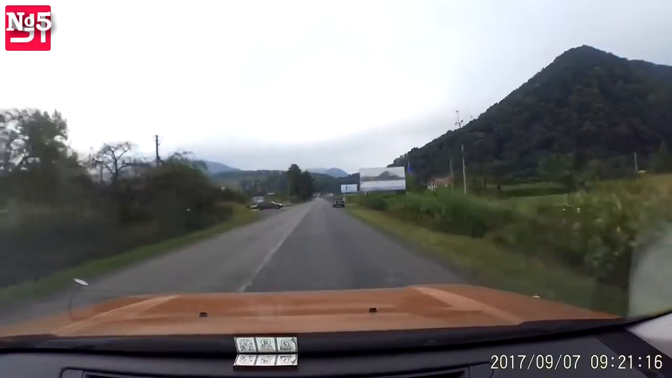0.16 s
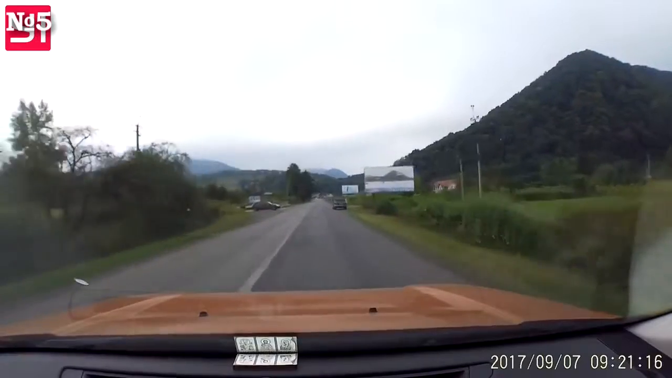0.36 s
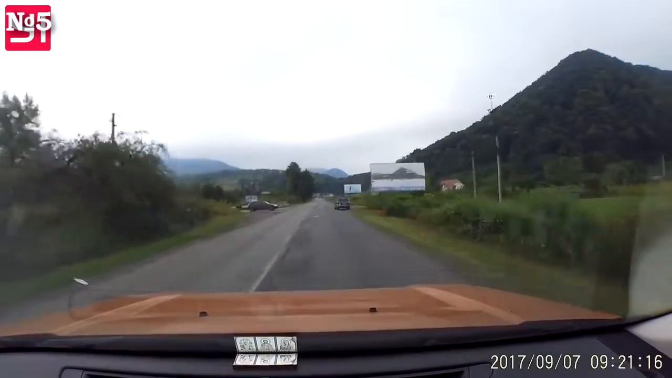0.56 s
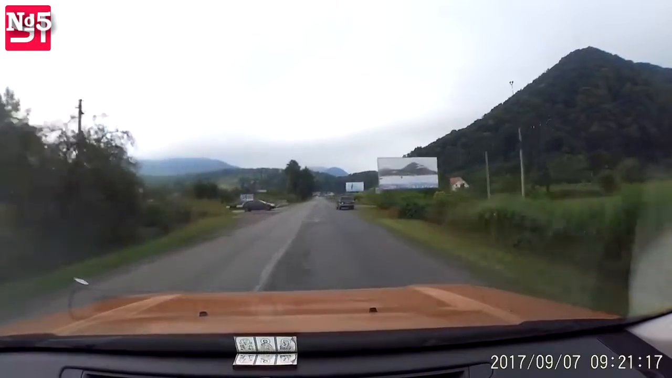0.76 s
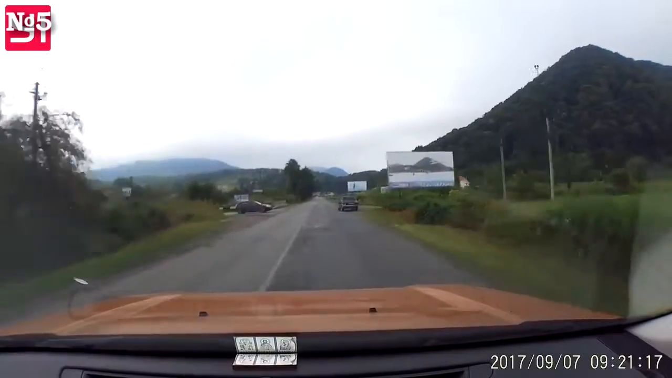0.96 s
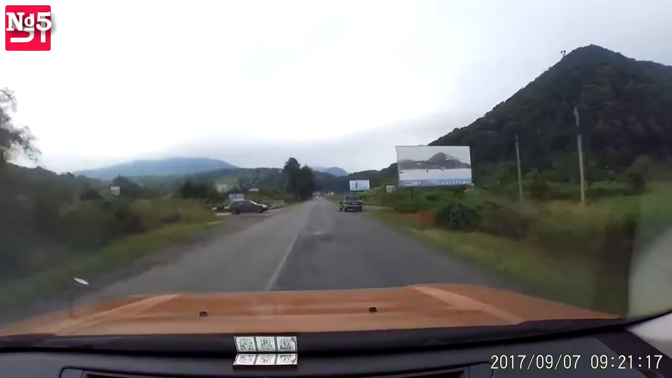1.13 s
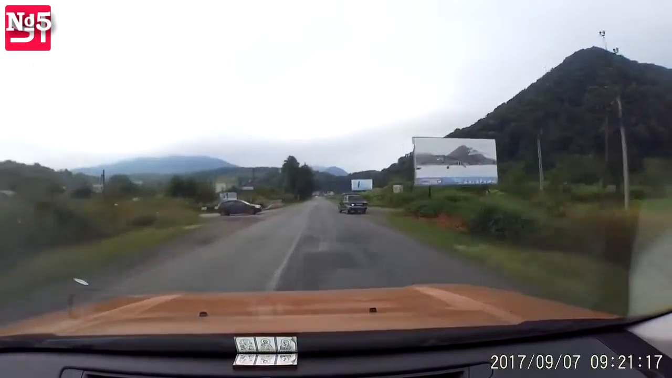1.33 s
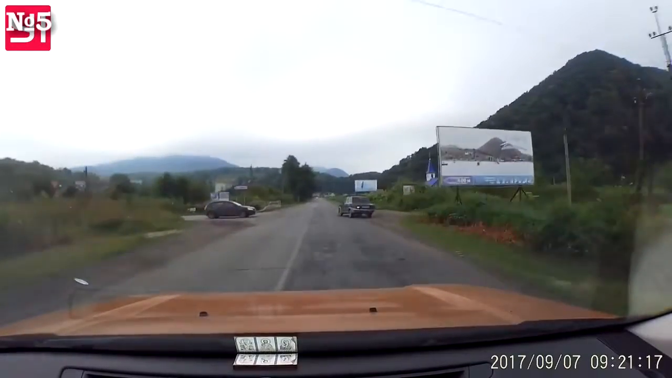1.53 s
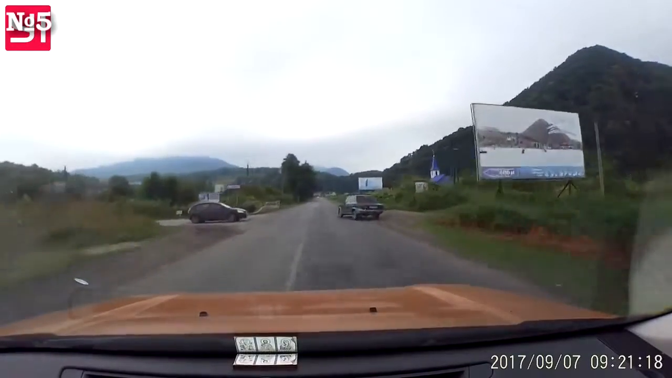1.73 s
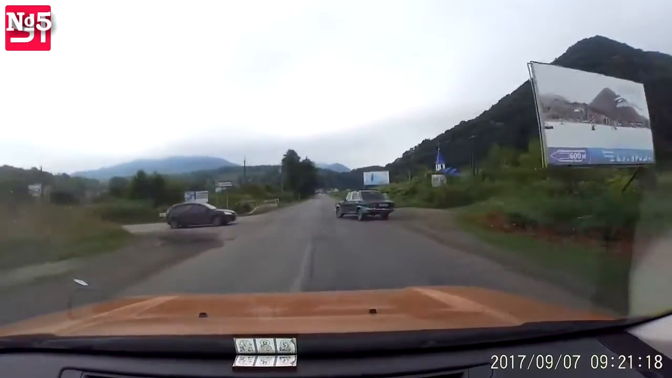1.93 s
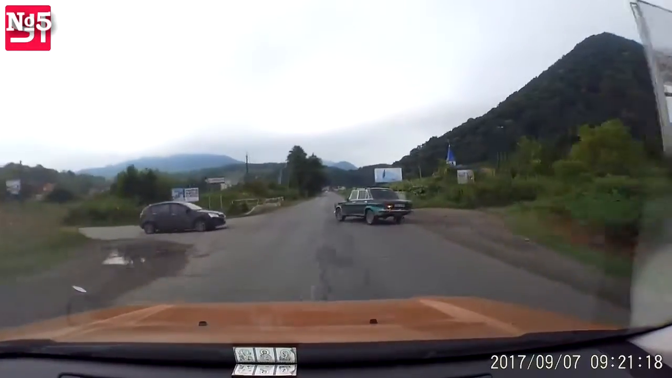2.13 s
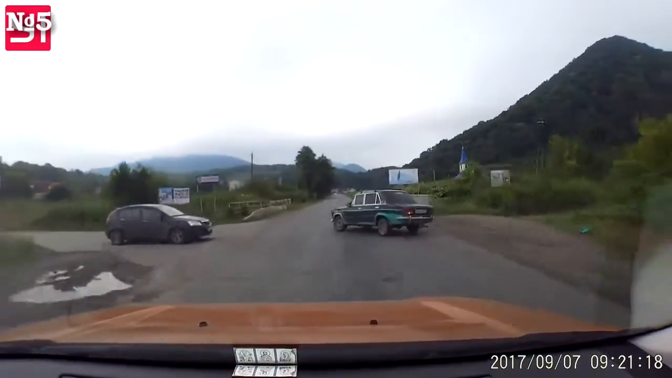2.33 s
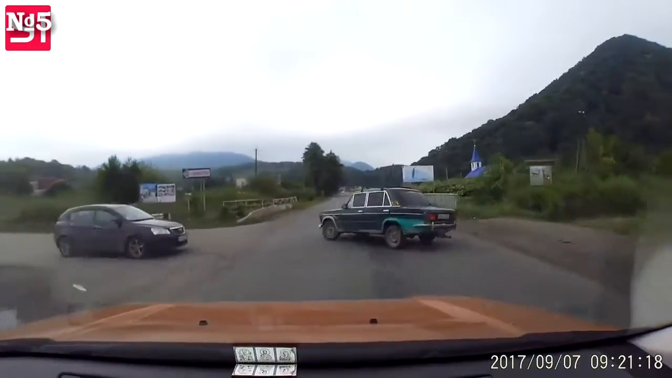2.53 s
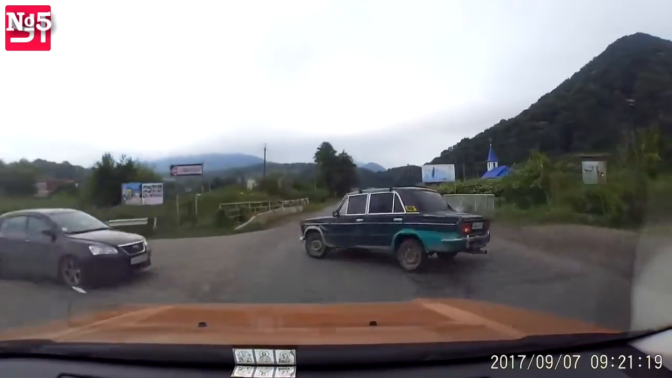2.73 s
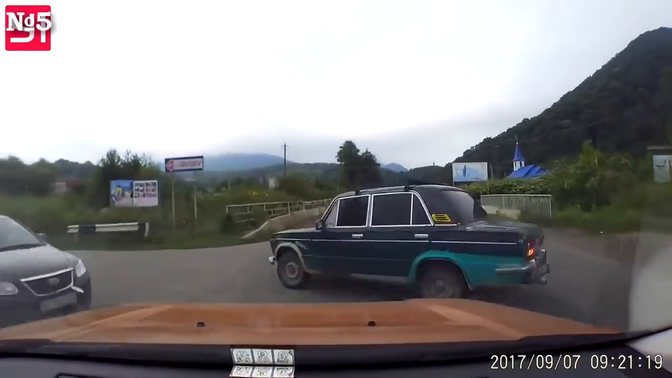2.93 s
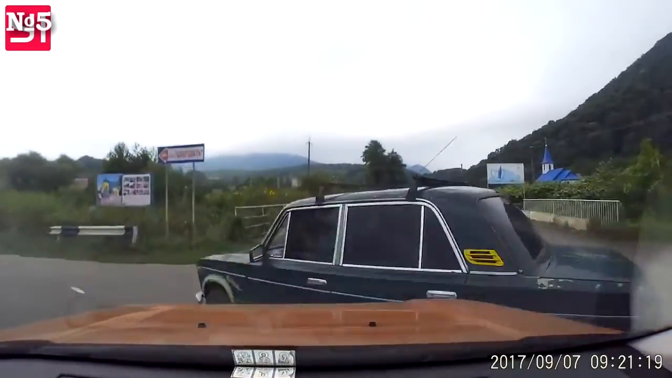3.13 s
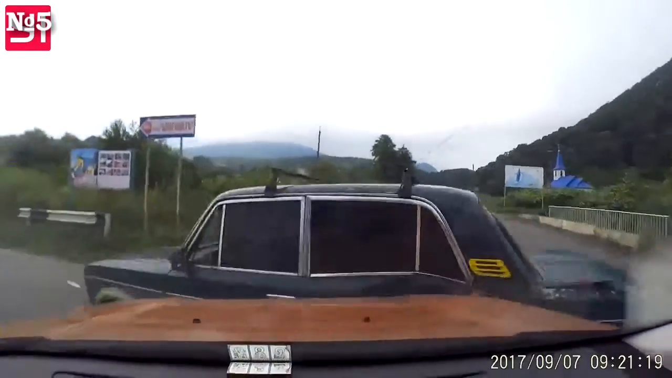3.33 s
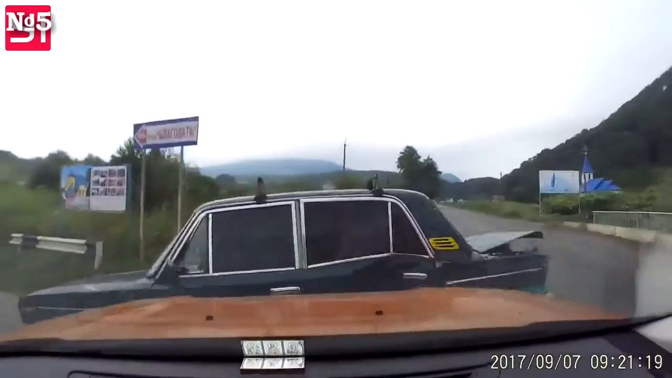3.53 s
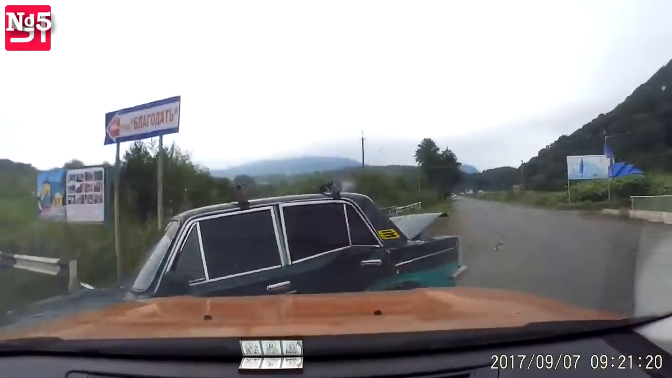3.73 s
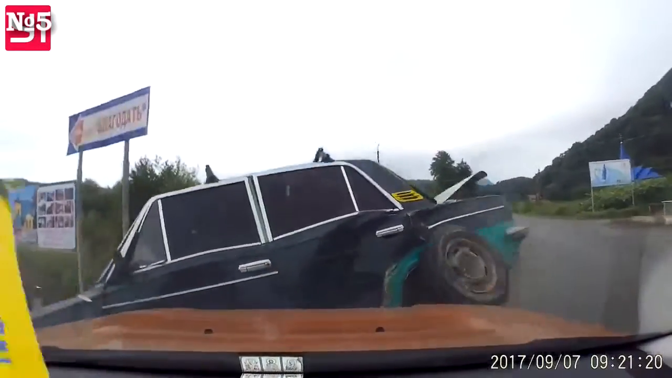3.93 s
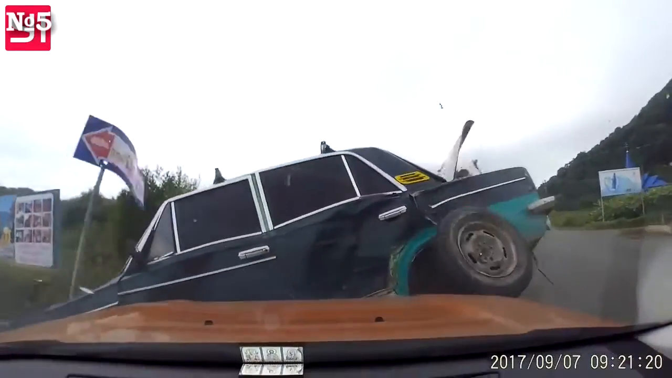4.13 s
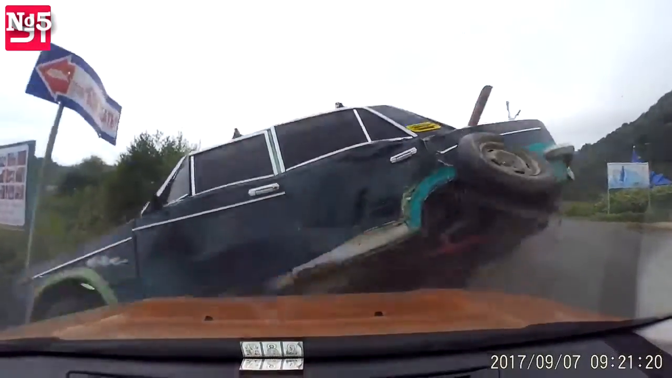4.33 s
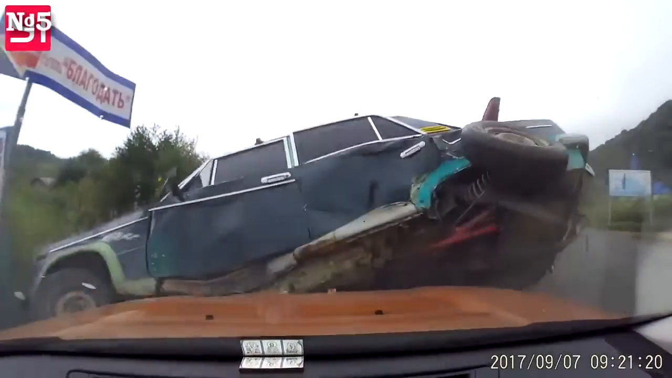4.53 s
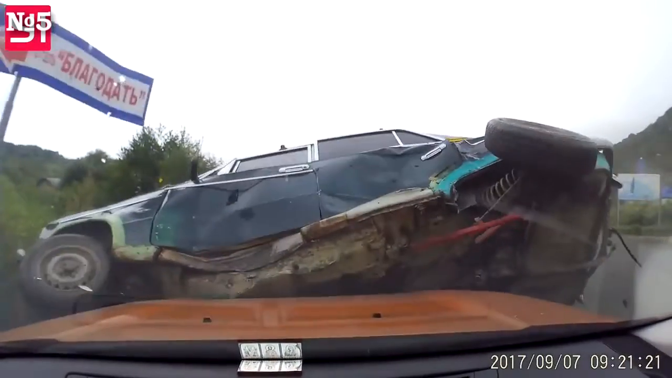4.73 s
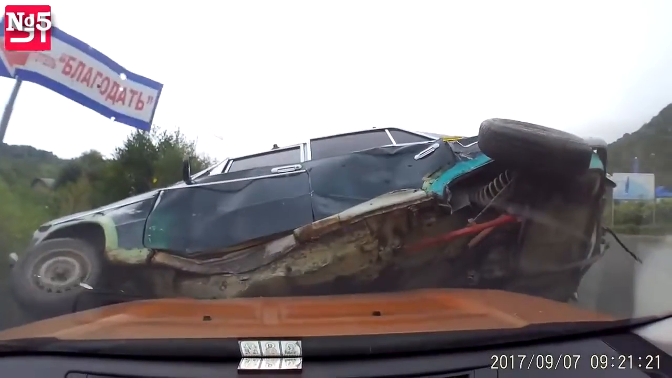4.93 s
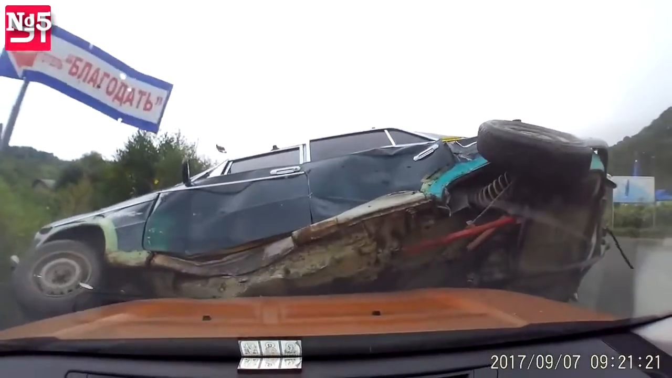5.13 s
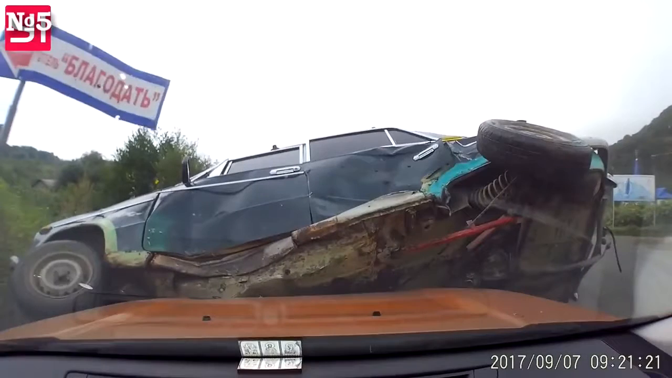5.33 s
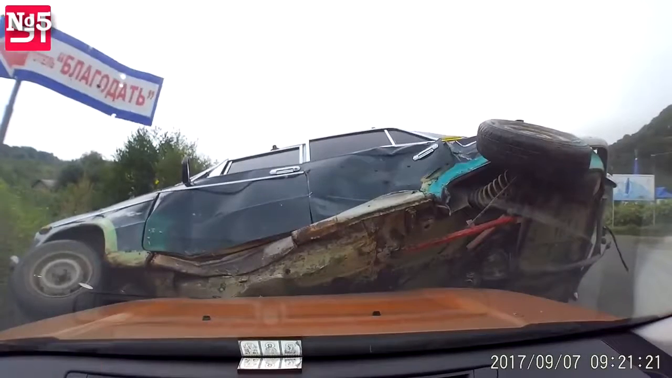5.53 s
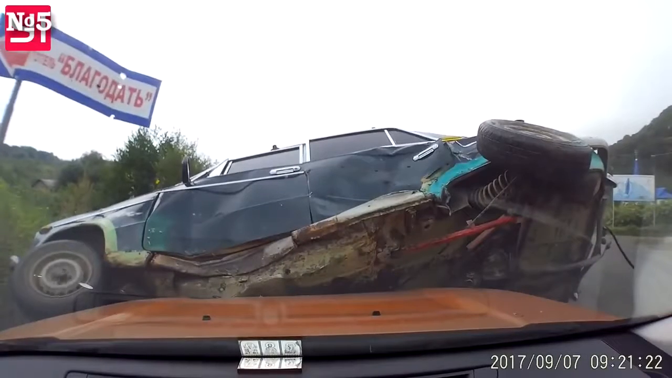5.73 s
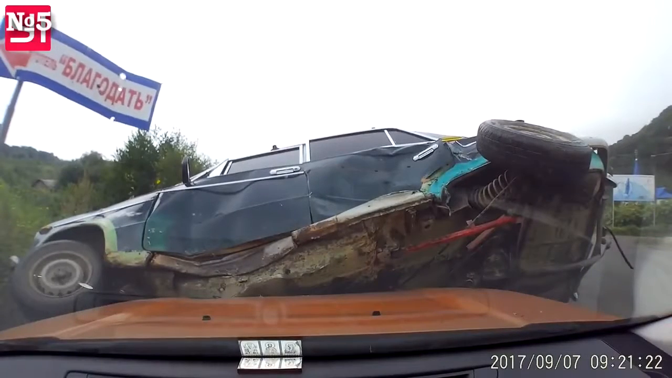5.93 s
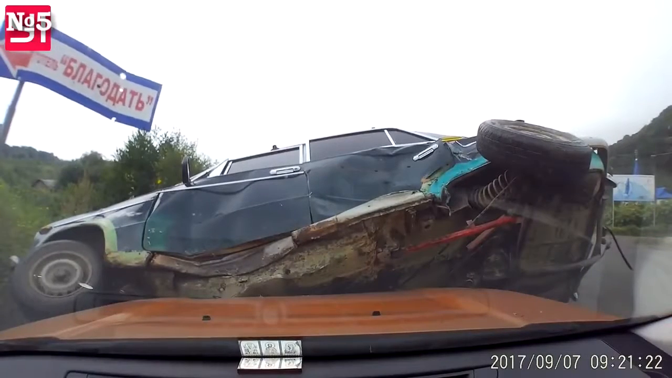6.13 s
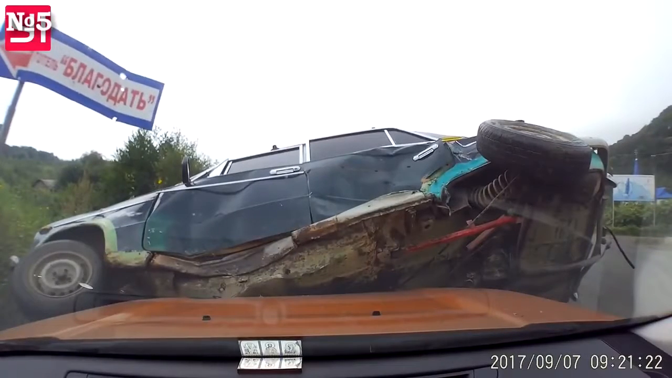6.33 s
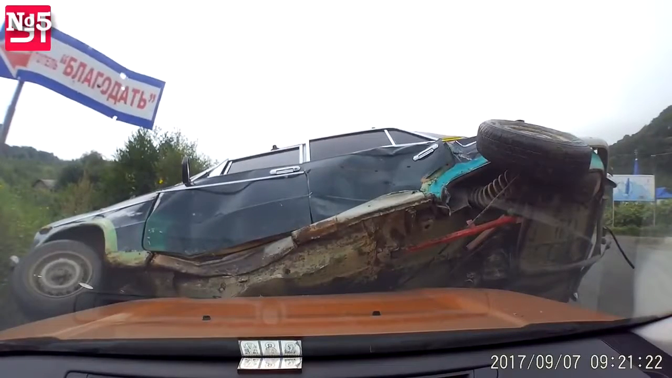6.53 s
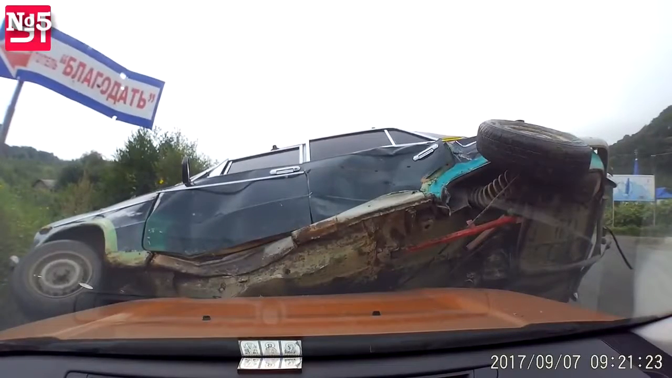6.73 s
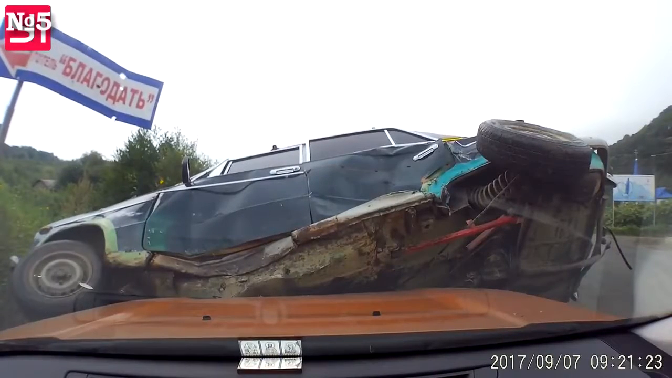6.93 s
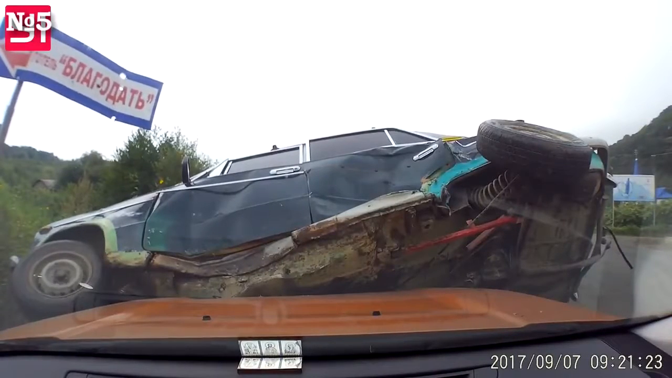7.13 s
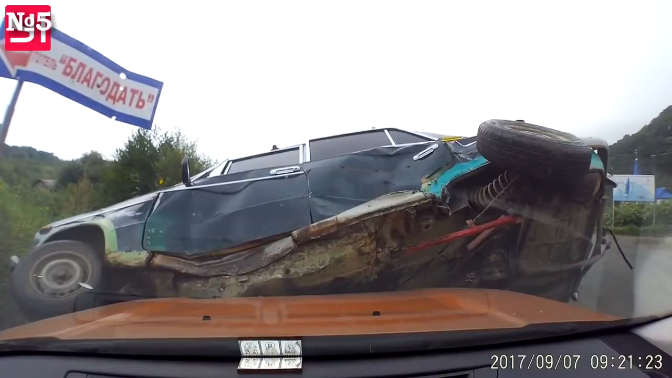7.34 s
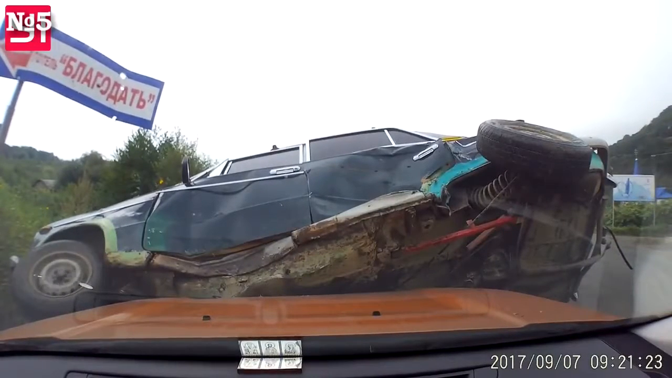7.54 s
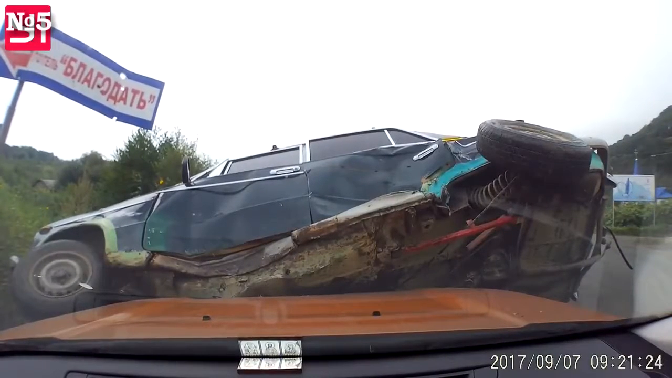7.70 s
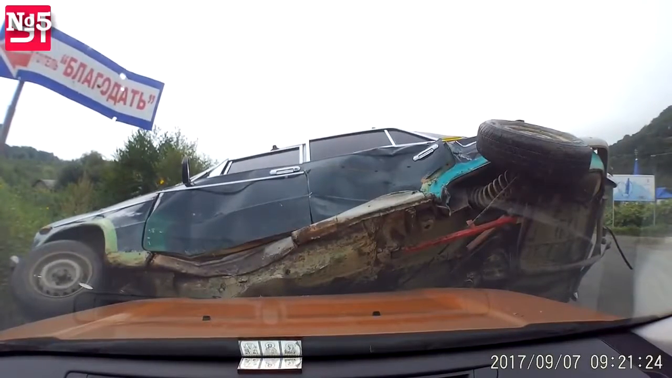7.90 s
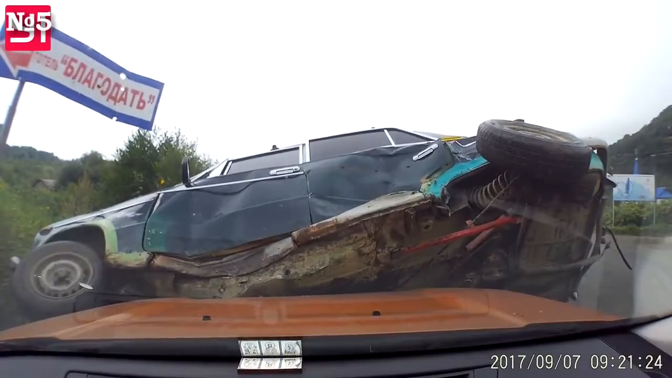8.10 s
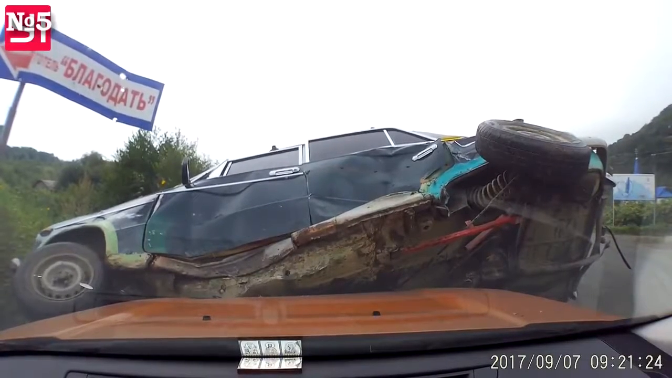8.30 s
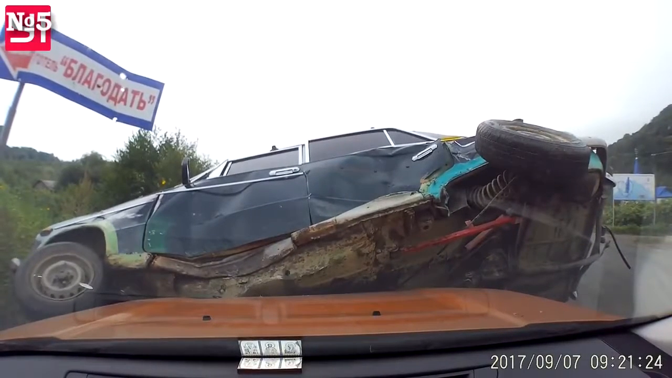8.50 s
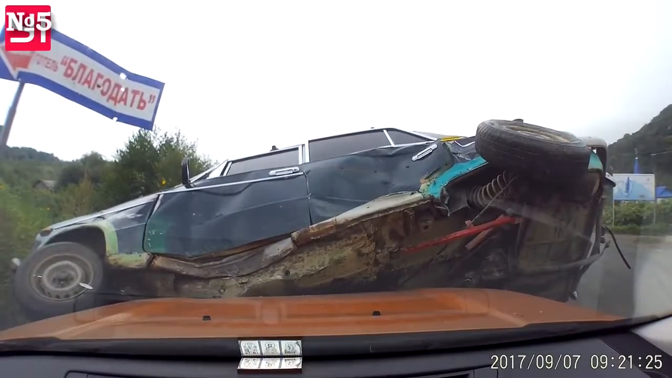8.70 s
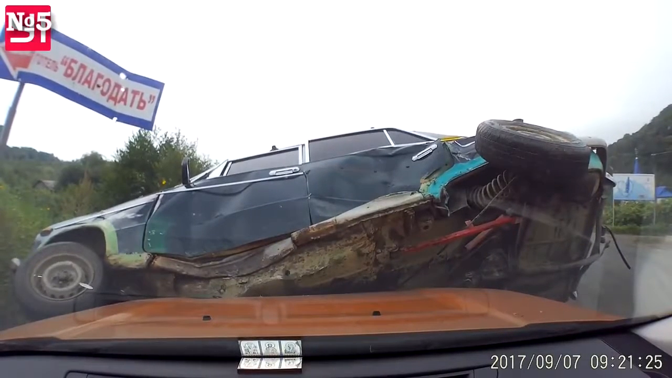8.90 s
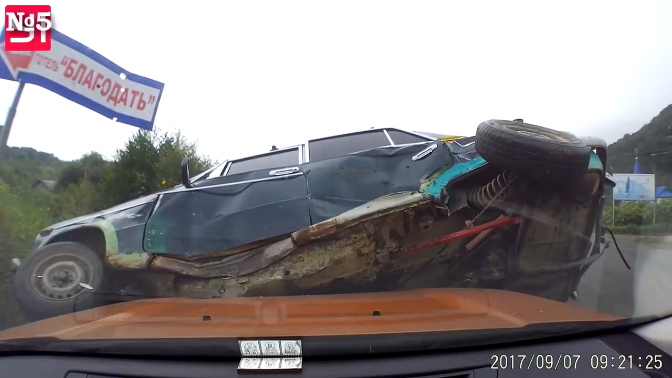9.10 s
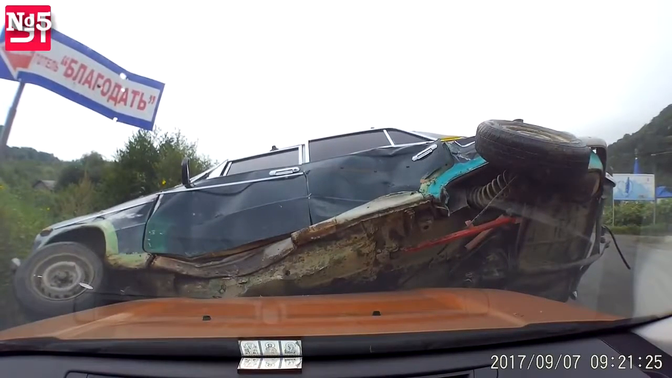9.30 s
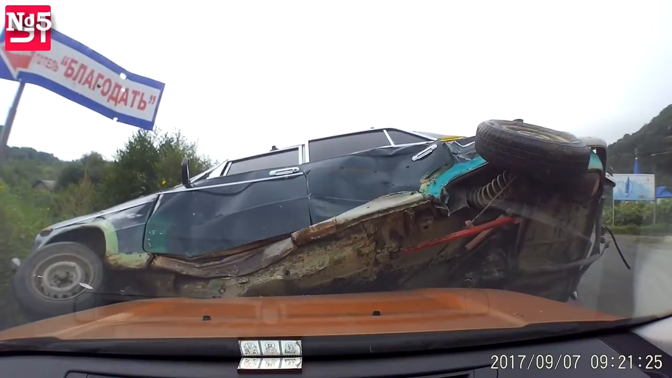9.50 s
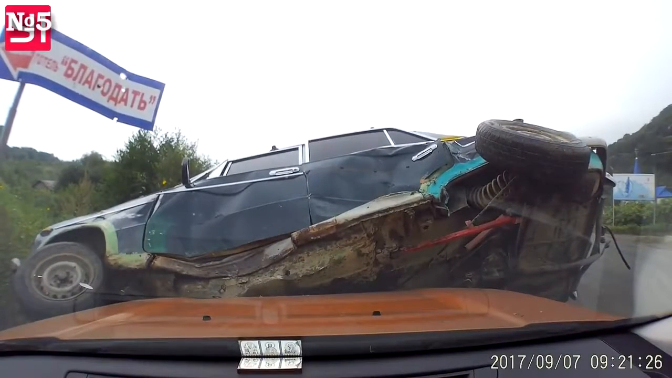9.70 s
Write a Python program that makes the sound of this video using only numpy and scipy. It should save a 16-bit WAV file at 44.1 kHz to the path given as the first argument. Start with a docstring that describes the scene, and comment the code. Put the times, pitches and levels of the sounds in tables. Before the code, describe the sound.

From inside a car, road rumble and a gritty skid end in heavy crash bangs and crumpling metal, then the engine idles and races.

```python
"""Car crash, heard from inside.

On a country road the body booms over rough asphalt, the tyres skid on grit and the car rams another.
Sheet metal crumples and splinters as the other car is shoved up on its side. Loose parts settle over
the idling engine, which races at the end. The windscreen microphone overloads on the heaviest blows."""
import sys
import numpy as np
from scipy import signal
from scipy.fft import rfft, irfft, next_fast_len
from scipy.io import wavfile

SR = 44100
rng = np.random.default_rng(int(sys.argv[2]) if len(sys.argv) > 2 else 0)


def persist_wave(psi):
    """Save psi, clipped to +-1, as 16-bit WAV."""
    counts = np.round(np.clip(psi, -1, 1) * 32767).astype(np.int16)
    wavfile.write(sys.argv[1], SR, np.atleast_2d(counts).T)


N = 430416
TIME_S = np.arange(N) / SR

# Chassis blows. Each row: start in seconds, level in dB, length in seconds, tilt in dB per octave.
BLOWS = [(1.946, -25, 0.011, 3.5), (2.409, -29, 0.0051, 10), (2.69, -21.5, 0.024, 5.5),
         (3.171, -24.5, .008, 2), (3.292, -22, 0.015, 3.5), (3.325, -6, 0.031, 2),
         (3.368, -14.5, 0.015, -2), (3.528, -25, 0.016, -1), (3.888, -29.5, 0.026, 3.5),
         (3.958, -22.5, 0.067, 2.5), (4.082, -22, 0.035, 0), (4.395, -26, 0.056, 2.5), (4.51, -18, .008, 2),
         (4.525, -5, 0.0071, -5), (4.696, -29.5, 0.0086, 2), (4.755, -35, 0.034, -7),
         (5.244, -33, 0.013, 5), (6.117, -43, .015, 3), (6.334, -43, 0.031, 4), (6.376, -38, 0.029, 1.5),
         (6.763, -44, 0.0093, -6), (7.037, -36, 0.022, -1), (7.3425, -42.5, 0.026, 2.5),
         (7.925, -32, 0.038, -1), (8.0, -37.5, 0.04, 2), (8.287, -37.5, 0.016, 0)]
# Metal crumpling. Each row: start in seconds, level in dB, length in seconds, tilt in dB per octave.
BUCKLINGS = [(2.223, -32.5, .006, 3), (2.696, -32, 0.0076, 4), (2.979, -27, 0.0037, 8),
             (3.17, -18, 0.009, 0.5), (3.19, -38, 0.14, 6.5), (3.218, -27, 0.0034, -6),
             (3.3104, -10.5, 0.0019, 2.5), (3.326, -17.5, 0.028, -1), (3.414, -33, 0.022, 1.5),
             (3.464, -36, 0.0052, 5), (3.510, -43, .006, 7), (3.897, -32.5, 0.0079, 5.5),
             (3.96, -38, .15, -6.5), (4.002, -27, 0.02, -3.5), (4.39, -41, 0.045, -4),
             (4.495, -36, 0.013, 0), (4.521, -27, 0.0055, -1.5), (4.738, -42.5, 0.028, 3),
             (4.813, -44, .01, 9), (4.982, -44, .005, 12), (5.144, -43, 0.066, -8),
             (5.242, -28.5, 0.004, -1.5), (5.255, -26.5, 0.013, 1), (5.264, -23.5, 0.0047, -2),
             (5.32, -40, 0.015, 4), (5.482, -39, .004, 4.5), (5.7226, -33, 0.0038, -1),
             (5.782, -45, 0.012, -1), (5.808, -40, 0.0088, 5), (5.864, -42, .006, -16),
             (6.092, -43.5, .01, 3), (6.121, -39.5, 0.021, 6), (6.319, -45, 0.009, 6),
             (6.378, -41, 0.0066, -2.5), (7.032, -46.5, .008, -1), (7.345, -47, .006, 0),
             (8.358, -45, .008, -3)]
# Glass and plastic breaking. Each row: start in seconds, level in dB, length in seconds.
SHOWERS = [(2.148, -37.5, 0.0094), (3.325, -29.5, 0.026), (3.419, -31.5, 0.02), (3.59, -42.5, 0.0063),
           (3.9, -40, 0.0095), (4.013, -38.5, .005), (4.515, -23.5, 0.00073), (4.536, -32, .0015),
           (4.727, -50, 0.011), (5.211, -41.5, 0.023), (5.34, -40, .004), (5.362, -39.5, 0.0045),
           (5.781, -49, 0.0089), (5.807, -44.5, 0.0059), (6.096, -48, 0.0081), (6.116, -42, 0.029),
           (6.236, -51, 0.012), (6.324, -50.5, .01)]
# Stones and trim. Each row: start in seconds, level in dB.
HARD_TICKS = [(.2035, -39), (.329, -38), (2.0335, -34), (2.0495, -36), (2.1395, -29), (2.305, -24),
              (2.355, -28), (2.652, -31)]
# Loose parts. Each row: start in seconds, level in dB, pitch in Hz.
KNOCKS = [(1.299, -40, 1005), (1.662, -42.5, 1060), (2.019, -41, 1013), (5.269, -30, 1190),
          (5.7255, -37, 965), (5.863, -39, 940), (6.13, -40.5, 2450)]
# Dashboard. Each row: start in seconds, level in dB, length in seconds, slips per second.
DASH_CREAKS = [(1.854, -42.5, 0.031, 305), (2.068, -46, 0.013, 380)]

# Resonances. Each row: frequency in Hz, width in Hz, gain in dB.
BODY_MODES = [(41.5, 18.4, 1), (69.4, 39, -5.5), (101.9, 21.2, 2.5), (172, 45.4, -5.5), (218, 58, -5),
              (323.5, 99, -12), (419, 162, -17), (622, 244, -27.5)]
PANEL_MODES = [(480, 280, -0.5), (710, 150, 6.5), (1023, 230, 1.5), (1377, 370, -1.5), (1690, 370, -2),
               (2100, 380, -7), (2670, 160, -2.5), (3180, 430, -6.5), (4270, 1120, -9.5)]
SHARD_MODES = [(3520, 1800, -1), (5260, 1300, 4), (5940, 620, 6.5), (7040, 1600, 1.5)]
TICK_MODES = [(1900, 900, -6), (5200, 1500, -1), (7300, 1500, 0)]
CREAK_MODES = [(1820, 220, 7), (2900, 400, 5), (4050, 400, -6.5)]
SUSPENSION_MODES = [(27.9, 6.4, -2), (41.14, 7.4, 0)]
AIR_MODES = [(64, 20.3, 2), (92, 25.6, -1.5), (113.8, 17.4, 0.5)]

# Road noise. Each row: time in seconds, then suspension boom, cabin drone, tyre roar in relative dB.
RIDE_LEVELS = [(0, -43, -32, -36.5), (.14, -24, -34.5, -35), (.4, -28, -33, -38.5), (.64, -25, -29, -38),
               (.74, -36, -33.5, -37), (.82, -33.5, -27, -35.5), (1.03, -28, -30.5, -36.5),
               (1.13, -17, -23, -37), (1.25, -37, -26, -38), (1.36, -37, -32, -37.5), (1.6, -29, -32, -36),
               (2.0, -25.5, -29, -36.5), (2.21, -29, -25, -35), (2.29, -14.5, -22.5, -32),
               (2.45, -23.5, -23, -34.5), (2.6, -23, -25, -39), (2.87, -20.5, -17, -31),
               (2.99, -16.5, -17.5, -36.5), (3.12, -26, -33, -37), (3.24, -24.5, -28.5, -33),
               (3.38, -27, -16.5, -31), (3.46, -24.5, -31.5, -36.5), (3.53, -20, -30, -45),
               (3.63, -24.5, -36.5, -50), (3.76, -26.5, -31.5, -50), (3.92, -28.5, -27.5, -42.5),
               (4.02, -14.5, -23.5, -39), (4.15, -17.5, -32, -34), (4.27, -20, -29, -53),
               (4.35, -31.5, -35, -46), (4.44, -24, -25, -36), (4.58, -20, -24, -32),
               (4.66, -23.5, -43, -54), (4.76, -30.5, -37, -33.5), (4.83, -22, -26.5, -40),
               (4.92, -33, -37.5, -45.5), (5.02, -24.5, -29, -47), (5.16, -38, -28, -42.5),
               (5.3, -31, -36.5, -42), (5.43, -32.5, -49, -46.5), (5.61, -44, -51, -53)]
# Tyres and wreck sliding. Each row: time in seconds, then scrape and grit hiss in relative dB.
SLIDE_LEVELS = [(0, -53.5, -58.5), (.7, -52, -55), (1.3, -51, -56.5), (1.75, -51, -56),
                (1.87, -45.5, -48.5), (2.1, -46, -53.5), (2.2, -47.5, -48.5), (2.28, -44, -45),
                (2.47, -51.5, -50.5), (2.62, -43.5, -44), (2.8, -46.5, -42.5), (2.95, -38, -36.5),
                (3.03, -50, -38), (3.09, -36.5, -32), (3.13, -42.5, -40), (3.17, -42, -85),
                (3.29, -63, -82), (3.37, -38, -43), (3.46, -51, -50), (3.52, -53, -54), (3.65, -61, -60.5),
                (3.85, -58, -62.5), (3.93, -45.5, -59), (4.04, -49, -55.5), (4.18, -53.5, -57.5),
                (4.25, -60.5, -57.5), (4.38, -56, -73), (4.48, -48.5, -57), (4.58, -50, -58),
                (4.67, -74, -73), (4.75, -48.5, -52.5), (4.9, -59, -61), (5.08, -58.5, -57),
                (5.2, -43.5, -55), (5.3, -47, -64), (5.4, -52, -56), (5.6, -55.5, -58), (5.9, -53, -63),
                (6.08, -62, -56), (6.17, -49, -49), (6.35, -44, -52), (6.6, -64, -64)]
# Engine load. Each row: time in seconds, then shake, exhaust note, clatter in relative dB.
ENGINE_LEVELS = [(5.3, -44, -66, -74), (5.72, -34, -57, -66), (6.2, -35, -56, -69), (6.47, -39.5, -62, -70),
                 (7.9, -36.5, -59, -64), (8.35, -37.5, -55, -62), (8.54, -32, -38.5, -51.5),
                 (8.72, -40, -44, -50), (9.0, -57, -38.5, -47), (9.22, -57, -35.5, -43),
                 (9.41, -57, -35, -38), (9.58, -57, -31.5, -37), (9.76, -67, -35, -34.5)]
# Engine speed. Each row: time in seconds, firings per second.
FIRING_RATE = [(5.4, 38.3), (5.72, 27.5), (6.21, 29.4), (6.47, 28.4), (7.05, 28.7), (7.9, 26.4), (8.34, 29),
               (8.54, 30.6), (8.64, 32.5), (8.75, 50.8), (8.85, 66), (9.0, 81), (9.2, 96), (9.3, 105),
               (9.4, 109), (9.6, 120), (9.76, 126)]
# Engine orders; a belt-driven pulley adds 1.75. Each row: multiple of the firing rate, level in dB.
ENGINE_ORDERS = [(.5, -9), (1, -2.5), (1.5, -17), (1.75, -6), (2, -3), (2.5, -14.5), (3, -6), (3.5, -15.5),
                 (4, -14.5), (4.5, -15.5), (5, -17), (6, -8), (7, -24), (8, -18), (9, -15.5), (11, -26)]
# Cabin response to the engine. Each row: frequency in Hz, gain in dB.
CABIN_RESPONSE = [(30, -17.5), (55, -2), (75, -15), (95, 0.5), (120, 2.5), (170, -5), (205, 1.5), (232, 9),
                  (255, -11), (305, 8), (370, -1), (430, -3.5), (480, 5.5), (540, -1.5), (610, 4),
                  (670, -8), (730, -1), (820, -14), (1300, -5)]

# Noise spectra. Each row: frequency in Hz, relative density in dB.
TYRE_SPECTRUM = [(82, -26), (140, -4.5), (206, 1.5), (363, -8), (410, -7), (567, -9), (876, -18),
                 (1020, -19), (1470, -29.5), (2500, -36), (3250, -53.5), (5500, -120)]
SCRAPE_SPECTRUM = [(700, -19), (1100, 5), (1600, 0.5), (2150, -1.5), (2650, 2), (3500, -1.5), (4500, -5),
                   (7000, -34.5)]
GRIT_SPECTRUM = [(2500, -21), (4000, -12), (5200, -1.5), (6300, -1.5), (7300, -0.5), (9000, -13.5),
                 (12000, -9.5)]
CLATTER_SPECTRUM = [(40, -5), (150, -6), (230, -7.5), (350, -4), (480, -10), (630, -8.5), (880, -16.5),
                    (1330, -17.5), (2150, -27), (3000, -23), (4000, -32), (5000, -34), (8000, -44.5)]
FAN_SPECTRUM = [(20, 10.5), (45, 0.5), (80, 0), (130, -2.5), (200, -5), (350, -7.5), (560, -7),
                (850, -15.5), (1100, -18), (1800, -24), (2900, -25.5), (5500, -31), (7300, -29),
                (8500, -40)]


def from_db(db):
    """Decibels to gain."""
    return 10 ** (np.asarray(db) / 20)


def rms_one(x):
    """Scale to rms 1."""
    return x / np.sqrt(np.mean(x ** 2) + 1e-20)


def in_time(rows):
    """One curve per column after the time."""
    times_s, *columns = np.transpose(rows)
    return [np.interp(TIME_S, times_s, column) for column in columns]


def at_hz(spectrum, hz):
    """Read dB on a log-frequency axis."""
    knots_hz, knots_db = np.transpose(spectrum)
    return np.interp(np.log(hz), np.log(knots_hz), knots_db)


def cut(x, hz, kind, order=2):
    """Butterworth filter."""
    return signal.sosfilt(signal.butter(order, hz, kind, fs=SR, output="sos"), x + 1e-18)


def colour(x, spectrum):
    """Apply a spectrum that falls away beyond its ends; rms 1."""
    size = next_fast_len(N)
    hz = np.maximum(np.arange(size // 2 + 1) * SR / size, 1)
    low_hz, high_hz = spectrum[0][0], 2 * spectrum[-1][0]
    skirts = 1 / np.sqrt((1 + (low_hz / hz) ** 8) * (1 + (hz / high_hz) ** 8))
    return rms_one(irfft(rfft(x, size) * from_db(at_hz(spectrum, hz)) * skirts, size)[:N])


def drift(rate_hz):
    """Random wander; rms 1."""
    knots_s = np.arange(0, TIME_S[-1] + 1, 1 / rate_hz)
    return rms_one(np.interp(TIME_S, knots_s, rng.standard_normal(len(knots_s))))


def grains(per_s, spread_db, size=N):
    """Random clicks of uneven strength."""
    strength = from_db(spread_db * np.minimum(rng.exponential(1, size), 4))
    return strength * rng.choice([-1, 1], size) * (rng.random(size) < per_s / SR)


def resonate(x, modes, tilt_db=0):
    """Parallel resonances with alternating signs, tilted per octave."""
    out = 0
    for k, (hz, width_hz, db) in enumerate(modes):
        radius = np.exp(-np.pi * width_hz / SR)
        feedback = [1, -2 * radius * np.cos(2 * np.pi * hz / SR), radius ** 2]
        band = signal.lfilter([1 - radius ** 2, 0, radius ** 2 - 1], feedback, x + 1e-18) / 2
        out = out + (-1) ** k * from_db(db + tilt_db * np.log2(hz / modes[0][0])) * band
    return out


def burst(length_s, t60_s, per_s, spread_db, lead=.5):
    """A leading snap, then clicks that hold for length_s and die away."""
    t = TIME_S[:SR // 2]
    snaps = grains(per_s, spread_db, len(t)) * from_db(-60 * np.maximum(t - length_s, 0) / t60_s)
    snaps[0] += lead * np.sqrt(np.sum(snaps ** 2))
    return snaps


def add_event(track, start_s, sound, db, held_s):
    """Mix in a sound with the energy of a level held for held_s."""
    gain = from_db(db) * np.sqrt(held_s * SR / (np.sum(sound ** 2) + 1e-20))
    start = round(start_s * SR)
    track[start:start + len(sound)] += gain * sound[:N - start]


def thuds():
    """Jolts set chassis and cabin air swinging; the mounts soften every edge."""
    out = np.zeros(N)
    for start_s, db, length_s, tilt_db in BLOWS:
        jolts = burst(length_s, t60_s=2.5 * length_s, per_s=1600, spread_db=2, lead=.57)
        add_event(out, start_s, resonate(jolts, BODY_MODES, tilt_db), db, length_s + .01)
    return cut(out, 1000, "low", order=3)


def crunches():
    """Each buckling is a run of snaps that rings the sheet metal."""
    out = np.zeros(N)
    for start_s, db, length_s, tilt_db in BUCKLINGS:
        snaps = burst(length_s, t60_s=.049, per_s=3000, spread_db=3, lead=.26)
        add_event(out, start_s, resonate(snaps, PANEL_MODES, tilt_db), db, length_s + .0027)
    return cut(out, 4000, "low", order=8) + from_db(-35) * cut(out, 5600, "high")


def splinters():
    """Showers of tiny shards swell and fade."""
    out = np.zeros(N)
    for start_s, db, length_s in SHOWERS:
        shards = burst(length_s, t60_s=2.6 * length_s + .003, per_s=8100, spread_db=2, lead=0)
        attack = np.minimum(TIME_S[:len(shards)] / (.29 * length_s), 1)
        add_event(out, start_s, resonate(shards * attack, SHARD_MODES), db, length_s + .00074)
    return out


def ride():
    """Bumps rock the body on its springs and pump the cabin air; the tread roars until the car stops."""
    boom_db, drone_db, roar_db = in_time(RIDE_LEVELS)
    bumps = cut(rng.standard_normal(N), 57.8, "low", order=4)
    sway = resonate(bumps, SUSPENSION_MODES)
    swell = np.abs(signal.hilbert(sway))
    damped = sway / (swell + .47 * swell.mean())   # dampers even out the swings
    boom = rms_one(damped) * from_db(boom_db + .5)
    pumping = cut(rng.standard_normal(N), [55, 150], "band")
    drone = rms_one(resonate(pumping, AIR_MODES)) * from_db(drone_db)
    tread = grains(per_s=2500, spread_db=2.87) * from_db(.97 * drift(22.13))
    roar = colour(tread, TYRE_SPECTRUM) * from_db(roar_db + 1.5)
    return (boom + drone + roar) * np.interp(TIME_S, [5.4, 5.7], [1, 0])


def slide():
    """Rubber and metal drag over grit: a grainy scrape under a fine hiss."""
    scrape_db, grit_db = in_time(SLIDE_LEVELS)
    judder_db = drift(35)
    coarse = grains(per_s=9000, spread_db=3.6) * from_db(1.1 * judder_db)
    fine = grains(per_s=14000, spread_db=4.3) * from_db(judder_db)
    scrape = colour(coarse, SCRAPE_SPECTRUM) * from_db(scrape_db)
    hiss = colour(fine, GRIT_SPECTRUM) * from_db(grit_db + 1)
    return (scrape + hiss) * np.interp(TIME_S, [5.3, 6.6], [1, 0])


def engine():
    """Firings shake the body, uneven cylinders add half orders, valve gear and intake clatter."""
    firing_hz, = in_time(FIRING_RATE)
    shake_db, note_db, clatter_db = in_time(ENGINE_LEVELS)
    phase = 2 * np.pi * np.cumsum(firing_hz * (1 + .012 * drift(70))) / SR
    octave_db = np.interp(TIME_S, [6.2, 6.6], [-16, -8])
    shake = np.cos(phase) + from_db(octave_db) * np.cos(2 * phase)
    note = np.zeros(N)
    for order, db in ENGINE_ORDERS:
        order_db = db - 5.5 + at_hz(CABIN_RESPONSE, order * firing_hz) + 1.85 * drift(25)
        note += from_db(order_db) * np.cos(order * phase + rng.uniform(0, 2 * np.pi))
    hum = np.sqrt(2) * (shake * from_db(shake_db) + note * from_db(note_db))
    pulsing = rng.standard_normal(N) * (1 + .5 * np.cos(phase))
    return hum, colour(pulsing, CLATTER_SPECTRUM) * from_db(clatter_db)


def ticks():
    """Stones and trim strike single hard ticks."""
    out = np.zeros(N)
    for start_s, db in HARD_TICKS:
        snap = burst(.0005, t60_s=.006, per_s=30000, spread_db=1)
        add_event(out, start_s, resonate(snap, TICK_MODES), db, held_s=.002)
    return out


def clanks():
    """Small loose parts ring like short bars."""
    out = np.zeros(N)
    for start_s, db, hz in KNOCKS:
        touch = burst(.002, t60_s=.02, per_s=2000, spread_db=2, lead=2.5)
        ring = resonate(touch, [(hz, 35, 0), (3 * hz, 70, -22)])
        add_event(out, start_s, ring, db, held_s=.014)
    return out


def creaks():
    """Dashboard plastic sticks and slips under braking."""
    out = np.zeros(N)
    t = TIME_S[:SR // 8]
    for start_s, db, length_s, per_s in DASH_CREAKS:
        slips = np.diff(np.floor(t * per_s), prepend=-1) * (t < length_s)
        slips *= rng.uniform(.25, 1, len(t))
        add_event(out, start_s, resonate(slips, CREAK_MODES), db, length_s)
    return out


def fan():
    """Steady rush of cabin air."""
    return from_db(-44) * colour(rng.standard_normal(N), FAN_SPECTRUM)


def cabin(x, t60_s, wet_db):
    """Glass and trim add a short, dense spray of treble reflections."""
    t = TIME_S[:SR // 4]
    spray = grains(per_s=3000, spread_db=2, size=len(t)) * from_db(-60 * t / t60_s) * (t > .001)
    echoes = cut(spray, 600, "high")
    echoes /= np.sqrt(np.sum(echoes ** 2))
    return x + from_db(wet_db) * signal.fftconvolve(x, echoes)[:N]


def scene():
    """Mono mix behind the windscreen; only airborne sound is reflected."""
    hum, clatter = engine()
    airborne = clatter + fan() + slide() + crunches() + splinters() + ticks() + clanks() + creaks()
    return (from_db(-2) * cabin(airborne, t60_s=.098, wet_db=-8) + ride() + thuds() + hum)[None]


def record(dry):
    """The input overloads with flat tops; the band ends steeply, with a faint leak above."""
    ceiling, cutoff_hz = .38, 8100
    clipped = dry / (1 + (dry / ceiling) ** 8) ** (1 / 8)
    centred = cut(clipped, 4.9, "high", order=1)
    band = signal.sosfilt(signal.cheby1(12, .3, cutoff_hz, fs=SR, output="sos"), centred)
    leak = from_db(-19) * cut(centred, 8500, "high", order=4)
    return cut(band + leak, 12000, "low", order=8)


dry = scene()
out = record(dry)
persist_wave(out)
```